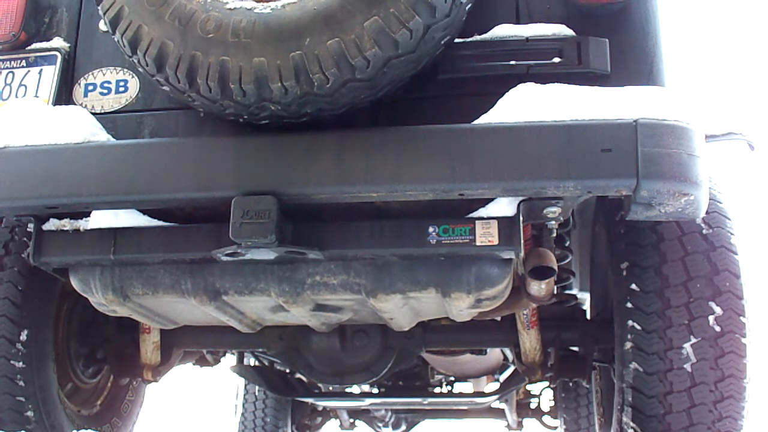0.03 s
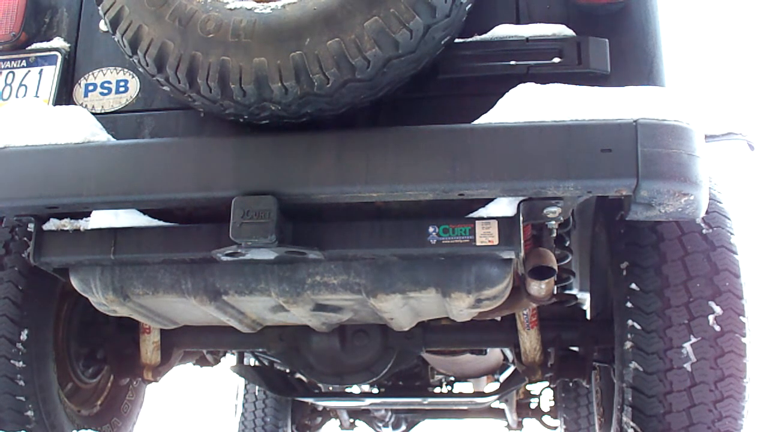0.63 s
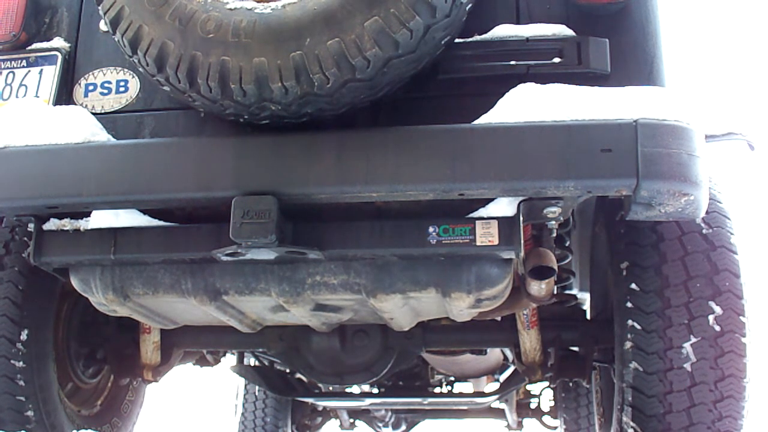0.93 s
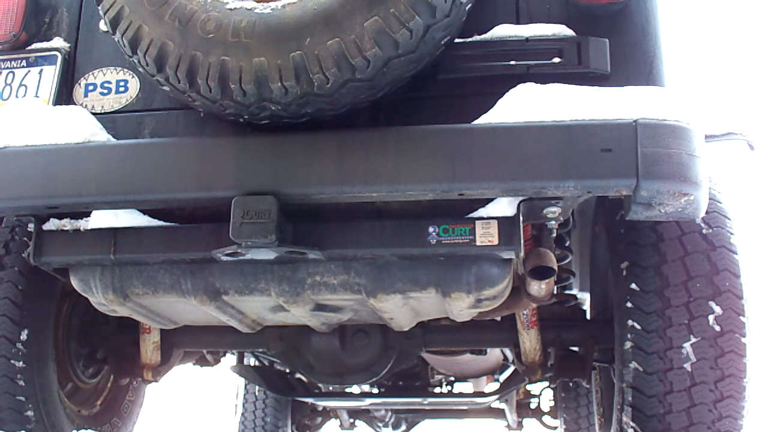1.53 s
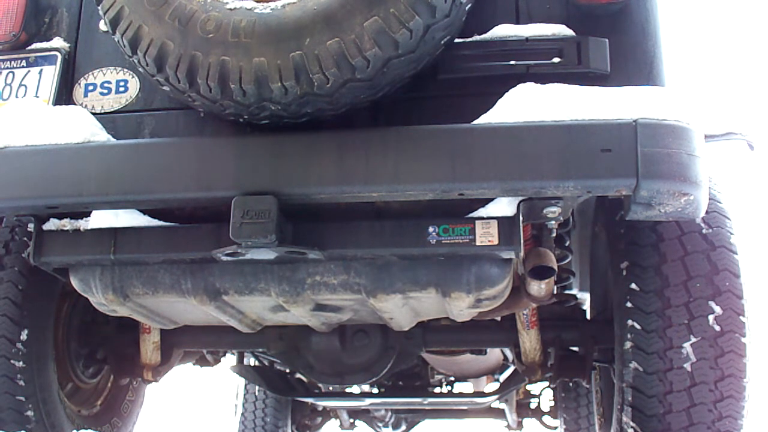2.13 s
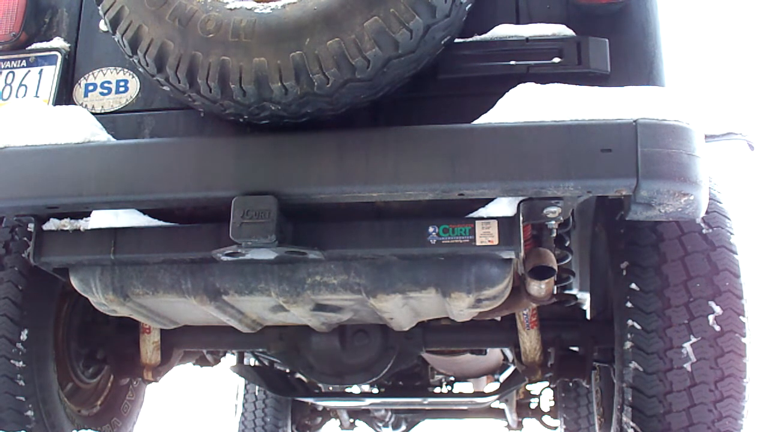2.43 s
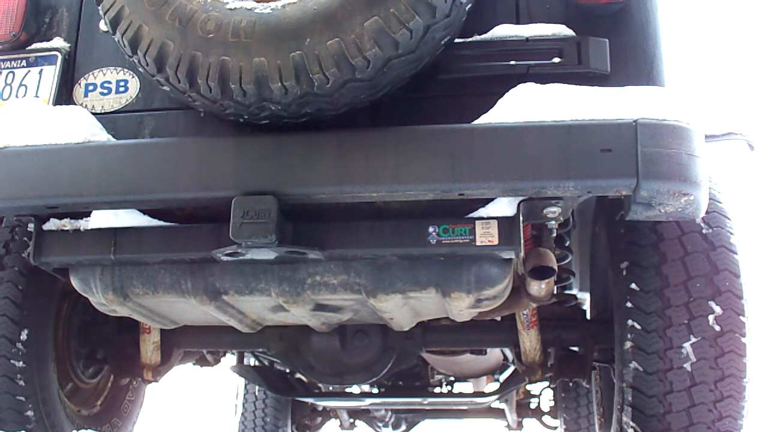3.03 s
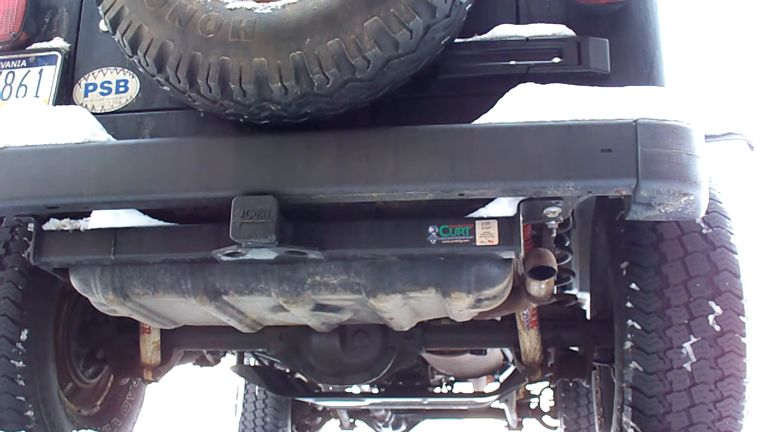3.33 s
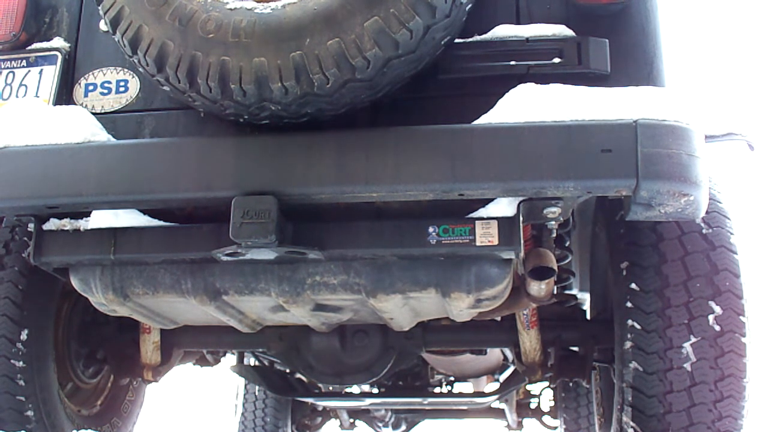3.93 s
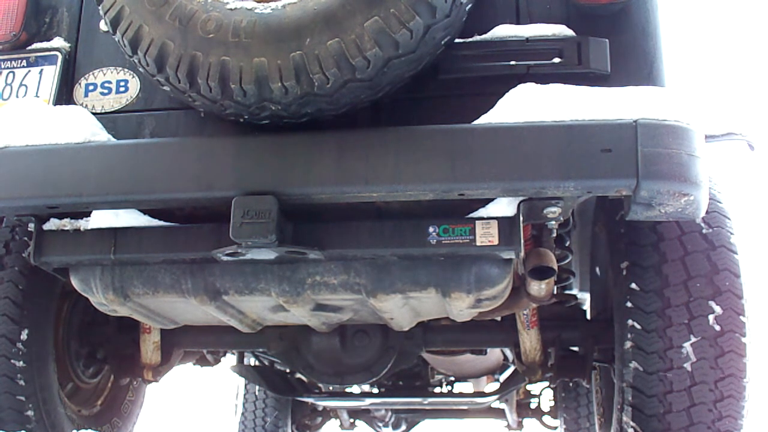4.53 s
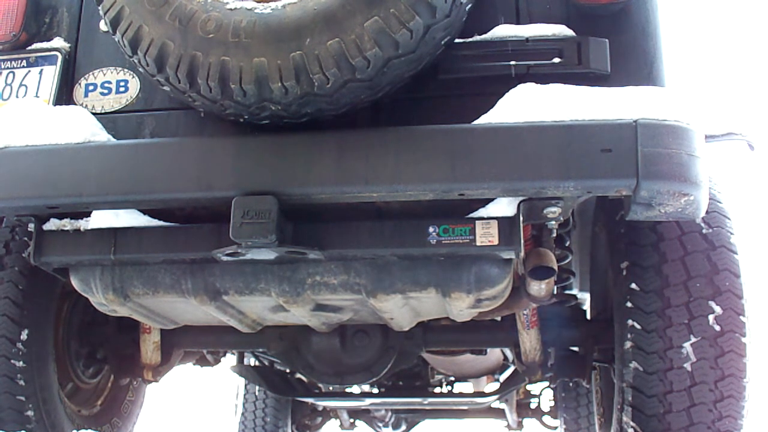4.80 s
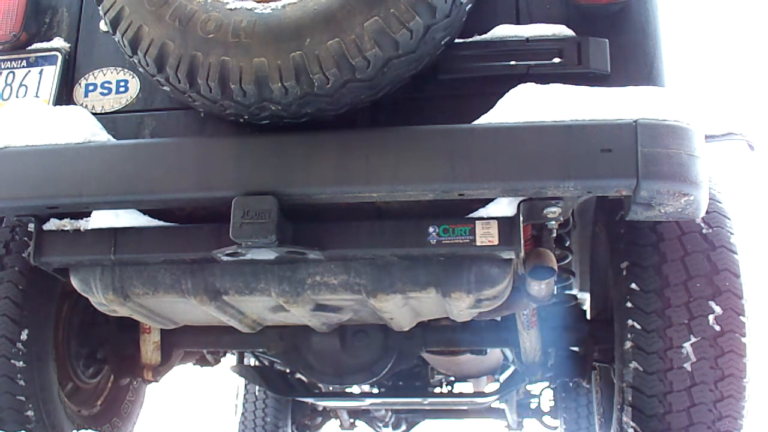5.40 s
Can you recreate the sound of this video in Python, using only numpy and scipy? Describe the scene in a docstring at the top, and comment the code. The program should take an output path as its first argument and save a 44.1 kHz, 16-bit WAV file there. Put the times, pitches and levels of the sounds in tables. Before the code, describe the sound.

Outdoors, close behind the tailpipe of an off-road vehicle, a few soft crunches sound over a faint distant rumble, followed by the very faint hum of a fuel pump. The starter engages with a metallic clash and cranks unevenly, whining and grinding. The engine coughs, then catches with a brief exhaust rattle, flares up loudly and sinks toward a fast idle.

```python
"""A four-cylinder engine is started on a cold day, heard outdoors from just behind the tailpipe.
Over a distant rumble come a few soft crunches, then the hum of the fuel pump. The starter engages;
its gear teeth whine and grind, sagging in pitch against each compression, and one cylinder coughs.
Then the engine catches and loose exhaust parts rattle. The train of firings drives the resonances
of the pipe as the speed flares up and sinks towards a fast idle."""
import sys
import numpy as np
from scipy import signal
from scipy.fft import rfft, irfft
from scipy.io import wavfile
from scipy.ndimage import uniform_filter1d

SR = 44100
rng = np.random.default_rng(int(sys.argv[2]) if len(sys.argv) > 2 else 0)


def wav_out(sig):
    """Save sig, one row per channel (or a flat mono array), as 16-bit PCM at SR to the path in sys.argv[1]."""
    wavfile.write(sys.argv[1], SR, np.round(np.clip(np.atleast_2d(sig).T, -1, 1) * 32767).astype(np.int16))


N = 245195
TIME = np.arange(N) / SR
BIN_HZ = np.arange(N // 2 + 1) * SR / N


def from_db(db):
    """Amplitude ratio of a level in decibels."""
    return 10 ** (np.asarray(db) / 20)

def rms_one(x):
    """Normalisation to unit power."""
    return x / np.sqrt(np.mean(x ** 2) + 1e-20)

def between(start, end, fade):
    """Trapezoidal gate that opens at start and is shut by end."""
    return np.clip((TIME - start) / fade, 0, 1) * np.clip((end - TIME) / fade, 0, 1)

def swell(centre, width):
    """Gaussian envelope of height 1."""
    return np.exp(-np.minimum(((TIME - centre) / width) ** 2, 50))

def cut(x, hz, kind, order=2):
    """Butterworth low- or high-pass filter."""
    return signal.sosfilt(signal.butter(order, hz, kind, fs=SR, output="sos"), x + 1e-18)

def drift(hz):
    """Random modulation: low-passed noise of unit power."""
    return rms_one(irfft(rfft(rng.standard_normal(N)) / (1 + (BIN_HZ / hz) ** 2), N))

def coloured(x, spectrum):
    """Spectral shaping by a smooth curve with steep skirts, at unit power."""
    hz = np.maximum(BIN_HZ, 1)
    points, db = np.transpose(spectrum)
    skirts = np.minimum(hz / points[0], 1) ** 4 * np.minimum(points[-1] / hz, 1) ** 8
    gain = from_db(np.interp(np.log(hz), np.log(points), db))
    return rms_one(irfft(rfft(x) * skirts * gain, N))

def resonate(x, modes):
    """Modal superposition: damped resonators in parallel, with alternating signs."""
    out = np.zeros(x.shape)
    for k, (hz, width, db) in enumerate(modes):
        r = np.exp(-np.pi * width / SR)
        poles = [1, -2 * r * np.cos(2 * np.pi * hz / SR), r * r]
        out += (-1) ** k * from_db(db) * (1 - r * r) / 2 * signal.lfilter([1, 0, -1], poles, x + 1e-18)
    return out

def evened(x):
    """Running normalisation: power stays near 1 over tenths of a second, and the pulses survive."""
    power = uniform_filter1d(uniform_filter1d(x * x, SR // 10), SR // 20)
    return x / np.sqrt(np.abs(power) + np.mean(x * x) / 1000)

def grains(per_s, spread_db):
    """Shot noise: dense random impulses of uneven size."""
    sizes = from_db(spread_db * np.minimum(rng.exponential(1, N), 4))
    return (rng.random(N) < per_s / SR) * sizes * rng.standard_normal(N)

def bursts(events, rise, hold, t60):
    """Mid and treble envelopes of short blows: linear attack, hold, exponential decay."""
    mids, treble = np.zeros(N), np.zeros(N)
    for s, db, treble_db in events:
        age = TIME - s
        shape = np.clip(age / rise, 0, 1) * from_db(-60 * np.clip(age - hold, 0, 2 * t60) / t60)
        mids += from_db(db) * shape
        treble += from_db(db + treble_db) * shape
    return mids, treble

def wavering_tone(hz, depth, drift_hz):
    """Random frequency modulation of a sinusoid of unit power."""
    phase = 2 * np.pi * np.cumsum(hz * (1 + depth * drift(drift_hz))) / SR
    return np.sqrt(2) * np.sin(phase)


# Course of the distant rumble. Each row: time in seconds, relative level in dB.
RUMBLE_LEVEL = [(0, -35.5), (0.3, -45), (1.0, -43), (1.6, -49.5), (2.7, -44.5)]
# Spectra of the rumble and of still air. Each row: frequency in Hz, relative density in dB.
RUMBLE_COLOUR = [(22, 3), (80, -4.5), (130, -16.5), (200, -21.5)]
AIR_COLOUR = [(160, 1.5), (270, 2), (480, -3), (1100, -6.5), (1900, -11), (2900, -23), (4000, -27.5),
              (7000, -23), (9500, -40.5)]

def outdoor_air():
    """Ambient noise: distant rumble and still air are two slowly modulated random spectra."""
    rumble_db = np.interp(TIME, *np.transpose(RUMBLE_LEVEL)) - 1.5
    rumble = from_db(rumble_db) * coloured(rng.standard_normal(N), RUMBLE_COLOUR)
    return rumble + from_db(-56.5 + drift(6.9)) * coloured(rng.standard_normal(N), AIR_COLOUR)

# Faint tones. Each row: start and end in seconds, frequency in Hz, rms level in dB.
HUMS = [(-0.014, 0.128, 333, -53), (0.318, 0.388, 409, -53), (1.515, 2.148, 998, -66.5),
        (2.438, 2.537, 422, -60.5), (2.742, 2.836, 412, -48.5)]

def hums():
    """Gated tones waver by frequency modulation; the longest is the fuel pump."""
    return sum(from_db(db) * between(start, end, fade=0.02) * wavering_tone(hz, 0.0093, drift_hz=41)
               for start, end, hz, db in HUMS)

# Tiny high ticks. Each row: start in seconds, level in dB.
TICKS = [(2.141, -64), (2.728, -61)]

def ticks():
    """Exponential decay of a high band of noise is heard as a tick."""
    sizzle = coloured(rng.standard_normal(N), [(6600, 0), (8400, -7)])
    return sizzle * sum(from_db(db) * (TIME > s) * np.exp(-np.abs(TIME - s) / 0.045) for s, db in TICKS)

# A thin whine in the background. Each row: frequency in Hz, rms level in dB.
THIN_WHINE = [(7714, -79.5), (8285, -84)]

def thin_whine():
    """Superposition of two steady pure tones."""
    return sum(from_db(db) * np.sqrt(2) * np.sin(2 * np.pi * hz * TIME) for hz, db in THIN_WHINE)

# Soft crunches. Each row: start in seconds, relative level in dB, treble offset in dB.
CRUNCHES = [(0.049, -33, -25.5), (0.118, -35.5, -22), (0.222, -42, -21), (0.557, -33.5, -33),
            (0.61, -40.5, -21), (0.672, -31, -20), (0.796, -32, -24.5), (0.84, -40, -37), (0.883, -42, -19),
            (0.951, -28, -22.5), (1.057, -33.5, -22), (1.205, -32, -20)]
# Spectra of a crunch and of every source's hiss. Each row: frequency in Hz, relative density in dB.
CRUNCH_COLOUR = [(220, -0.5), (450, 5.5), (700, 4), (950, -1.5), (1250, -3), (2100, -10), (2800, -11.5),
                 (3600, -20.5)]
HISS_COLOUR = [(4300, -11.5), (5200, -2.5), (6600, 3), (7700, -0.5), (8700, -8), (9600, -29.5)]

def crunches():
    """Granular noise: each crunch is a short swarm of contacts with a faint tail."""
    mids, treble = bursts(CRUNCHES, rise=0.004, hold=0.018, t60=0.11)
    tail, _ = bursts(CRUNCHES, rise=0.0041, hold=0.038, t60=0.88)
    envelope = from_db(-14) * mids + from_db(-28) * tail
    body = envelope * coloured(grains(5000, spread_db=2), CRUNCH_COLOUR)
    return body + from_db(-6) * treble * coloured(grains(4300, spread_db=0), HISS_COLOUR)

# Blows of loose exhaust parts. Each row: start in seconds, relative level in dB, treble offset in dB.
RATTLES = [(3.979, -27.5, -7), (4.037, -29, -6), (4.065, -32, -16), (4.118, -28.5, -10)]
# Modes of their sheet metal. Each row: frequency in Hz, bandwidth in Hz, relative gain in dB.
SHEET_MODES = [(480, 44, 8), (1724, 134, -0.5), (2340, 71, -1.5), (2616, 81, -7), (3180, 28, -3)]

def rattles():
    """Impact excitation of plate modes: the first hard firings shake thin metal against its mounts."""
    mids, treble = bursts(RATTLES, rise=0.0019, hold=0.0068, t60=0.21)
    contacts = rms_one(grains(2500, spread_db=-1.5))
    return from_db(16) * resonate(mids * contacts, SHEET_MODES) + treble * coloured(contacts, HISS_COLOUR)

# Pinion striking flywheel. Each row: start in seconds, relative level in dB, treble offset in dB.
CLASHES = [(2.812, -21, -7), (2.835, -27, -9.5), (3.306, -22.5, -7), (3.596, -18.5, -10), (3.719, -22, -16),
           (3.84, -33, -6)]
# Spectrum of grinding teeth. Each row: frequency in Hz, relative density in dB.
GRIND_COLOUR = [(200, -5), (700, -5), (1350, 0), (2200, -4.5), (3400, -19), (4300, -38.5)]
# Modes of the flywheel housing. Each row: frequency in Hz, bandwidth in Hz, relative gain in dB.
HOUSING_MODES = [(254, 6.2, 1), (694, 9.8, 3), (960, 9.3, -0.5), (1268, 70, 3), (1874, 9, -4.5),
                 (2340, 27, -12.5), (3150, 6.5, -9)]

def clashes():
    """Impulse response: clusters of hard metal contacts leave the housing ringing."""
    mids, treble = bursts(CLASHES, rise=0.00084, hold=0.0038, t60=0.24)
    contacts = rms_one(grains(2500, spread_db=-4.5))
    crash = from_db(-5) * mids * coloured(contacts, GRIND_COLOUR)
    ring = from_db(15) * resonate(mids * contacts, HOUSING_MODES)
    return crash + ring + treble * coloured(contacts, HISS_COLOUR)

def housing_howl(hz=700, db=-37.5):
    """Sustained resonance: in the last strokes the grinding keeps one housing mode singing unsteadily."""
    return from_db(db) * between(3.595, 3.865, fade=0.029) * wavering_tone(hz, 0.01, drift_hz=40)

# Lone firings before the engine runs. Each row: start in seconds, relative level in dB.
COUGHS = [(3.493, -2.5), (3.904, -5.5), (3.966, -2), (4.014, -4.5)]
# Low modes of the exhaust pipe. Each row: frequency in Hz, bandwidth in Hz, relative gain in dB.
LOW_PIPE_MODES = [(36.2, 9.1, -9), (106.4, 24.5, -3), (209.5, 23.3, -3)]

def coughs(length_s=0.0294):
    """Transient excitation of an air column: a lone firing sends one push and pull down the pipe."""
    puffs = np.zeros(N)
    for s, db in COUGHS:
        age = np.clip((TIME - s) / length_s, 0, 1)
        puffs += from_db(db) * np.sin(2 * np.pi * age) * np.sqrt(age)
    return from_db(-12.5) * puffs + from_db(7.5) * resonate(puffs, LOW_PIPE_MODES)

ENGAGE_S, RELEASE_S = 2.8, 3.985
# Strokes of the crank. Each row: fastest moment, time speeding up and time slowing down in seconds,
# top tooth rate in Hz, then relative levels of whine, groan, grind and hiss in dB.
STROKES = [(3.05, 0.21, 0.18, 1173, -29, -19.5, -29.5, -32.5),
           (3.328, .03, .15, 1297, -29, -50, -32.5, -34.5), (3.5, .05, .06, 897, -54, -50, -32.5, -31.5),
           (3.605, .025, .042, 996, -42, -22, -30.5, -25.5),
           (3.737, .085, 0.066, 1105, -35, -27.5, -30.5, -28),
           (3.869, .04, 0.03, 1108, -42.5, -45, -27.5, -27), (3.945, 0.019, 0.021, 815, -38, -25, -35, -55)]

def cranking(labouring_hz=658, spin_up_s=0.04, breakaway_s=0.17):
    """Load modulation: whine and hiss follow crank speed, grind and groan follow the compression."""
    from_engage = np.abs(TIME - ENGAGE_S)
    tooth_hz = labouring_hz * (1 - 0.5 * np.exp(-from_engage / spin_up_s))
    # powers add: a steady floor plus the effort of breaking the cold engine loose
    breakaway = np.exp(-np.minimum(from_engage / breakaway_s, 2) ** 4)
    whine = from_db(-49) ** 2 + (from_db(-28.5) * breakaway) ** 2
    grind = from_db(-34.5) ** 2 + (from_db(-29) * breakaway) ** 2
    hiss = from_db(-38.5) ** 2 + (from_db(-41) * breakaway) ** 2
    for s, rise, fall, top_hz, whine_db, groan_db, grind_db, hiss_db in STROKES:
        arch = np.cos(np.pi / 2 * np.interp(TIME, [s - rise, s, s + fall], [-1, 0, 1])) ** 2
        tooth_hz += (top_hz - labouring_hz) * arch
        groan = from_db(groan_db) * swell(s + 0.82 * fall, width=0.21 * fall)
        whine += from_db(whine_db) ** 2 * np.sqrt(arch) + groan ** 2
        grind += (from_db(grind_db) * swell(s + 0.46 * fall, width=0.57 * fall)) ** 2
        hiss += (from_db(hiss_db) * arch) ** 2
    return tooth_hz, np.sqrt(whine), np.sqrt(grind), np.sqrt(hiss)

# Harmonics of the gear mesh. Each row: multiple of the tooth rate, relative level in dB.
GEAR_PARTIALS = [(1, 3), (2, -1.5), (3, -8), (5, -8), (6, -13)]
# Modes of gear case and pinion. Each row: frequency in Hz, bandwidth in Hz, relative gain in dB.
GEAR_CASE_MODES = [(1460, 420, -1.5), (6440, 1140, 2)]
PINION_MODES = [(7708, 22, 0.5), (8290, 17, -3)]

def starter(brighten_db=4.5, pinion_teeth=9):
    """Gear meshing: periodic tooth contact whines at harmonics of the tooth rate, and friction grinds."""
    tooth_hz, whine_gain, grind_gain, hiss_gain = cranking()
    # backlash makes the mesh shiver in pitch and strength
    phase = 2 * np.pi * np.cumsum(tooth_hz * (1 + 0.03 * drift(250))) / SR
    # fast teeth meet harder, so the upper partials grow with speed
    tilt_db = brighten_db * np.log2(tooth_hz / 1150)
    mesh = sum(from_db(db + max(k - 2, 0) * tilt_db + 3.8 * drift(90)) * np.sin(k * phase)
               for k, db in GEAR_PARTIALS)
    whine = whine_gain * resonate(mesh, GEAR_CASE_MODES)
    # the pinion rubs harder once a turn
    rub = from_db(2 * np.sin(phase / pinion_teeth) + 1.2 * drift(80))
    contacts = grains(9000, spread_db=0) * rub
    grind = from_db(-3) * coloured(contacts, GRIND_COLOUR)
    grind += from_db(-4.5) * rms_one(resonate(contacts, HOUSING_MODES))
    hiss = from_db(-4) * coloured(contacts, HISS_COLOUR)
    pinion_ring = from_db(-46.5) * rms_one(resonate(contacts, PINION_MODES))
    # the labouring engine rocks the body and pumps air through the pipe
    shake = from_db(-8.5) * rms_one(resonate(cut(rng.standard_normal(N), 52, "low"), LOW_PIPE_MODES))
    engaged = between(ENGAGE_S, RELEASE_S, fade=0.012)
    return engaged * (whine + pinion_ring + grind_gain * (grind + shake) + hiss_gain * hiss)

def pipe_echo(x, reflection=0.27, spacing_hz=104):
    """Standing waves: sound runs up and down the tailpipe, losing strength on every trip."""
    round_trip = reflection * np.exp(-2j * np.pi * BIN_HZ / spacing_hz)
    return rms_one(irfft(rfft(x) / (1 - round_trip), N))

# What the silencer lets through. Each row: frequency in Hz, relative level in dB.
SILENCER = [(30, -22.5), (41, -16), (49, -18), (62, -34.5), (74, -29), (90, -30.5), (104, -18.5),
            (135, -19), (170, -23.5), (203, -15.5), (240, -39), (320, -32.5), (355, -47.5), (402, -27.5),
            (440, -41)]
# Pulse harmonics. Each row: multiple of the firing rate, gain in dB when round, gain in dB when sharp.
PULSE_SHAPE = [(1, 0.5, -1.5), (2, 2.5, -1.5), (3, -11, -3), (4, -13, -3.5), (6, -9.5, -1), (7, -13, -5)]

def boom(firing_hz, firings, sharpen_s=(4.55, 4.67)):
    """Fourier series of the pulses behind the silencer; they sharpen as the speed tops out."""
    silencer_hz, silencer_db = np.transpose(SILENCER)
    pulses = np.zeros(N)
    for k, round_db, sharp_db in PULSE_SHAPE:
        db = np.interp(np.log(k * firing_hz), np.log(silencer_hz), silencer_db)
        db += np.interp(TIME, sharpen_s, [round_db, sharp_db])
        phase = 2 * np.pi * k * firings + (k - 1) * np.pi / 2
        pulses -= from_db(db + 1.2 * drift(25)) * np.sqrt(2) * np.cos(phase)
    return pulses

# Engine speed. Each row: time in seconds, firings per second.
FIRING_RATE = [(4.04, 26.6), (4.094, 31.5), (4.144, 35.9), (4.23, 43.2), (4.296, 49.6), (4.364, 56.6),
               (4.454, 63.8), (4.598, 71.2), (4.69, 68.4), (5.168, 50.7), (5.388, 43.5), (5.56, 42.8)]
# Swells of the gas flow. Each row: centre in seconds, half width in seconds, relative rise in dB.
SURGES = [(4.09, 0.045, 2.5), (4.635, 0.092, 4), (5.038, .11, 5.5)]
# Cylinders in firing order. Each entry: relative strength in dB.
CYLINDERS_DB = [0.36, -0.44, -1.5, -1.8]
# Upper modes of the exhaust pipe. Each row: frequency in Hz, bandwidth in Hz, relative gain in dB.
HIGH_PIPE_MODES = [(311.4, 30, 5), (401.3, 9.4, 10.5), (498.6, 14, -0.5), (619.3, 13.5, 3.5),
                   (700, 39, -10), (934, 6.8, -3.5), (1041, 19, -1.5)]
# Spectrum of the turbulent gas. Each row: frequency in Hz, relative density in dB.
RASP_COLOUR = [(430, -4.5), (850, -13.5), (1200, -11.5), (2000, -18.5), (3200, -31), (4300, -29)]

def exhaust(uneven_db=1.0, puff_depth=0.14):
    """Forced vibration of an air column: each firing booms, rings the pipe and expels turbulent gas."""
    firing_hz = np.interp(TIME, *np.transpose(FIRING_RATE))
    firings = np.cumsum(firing_hz * (TIME > 3.92)) / SR
    count, cycle = firings.astype(int), firings % 1
    surge_db = sum(db * swell(s, width) for s, width, db in SURGES)
    flowing = np.clip((TIME - 3.925) / 0.03, 0, 1)
    running = np.clip((TIME - 4.03) / 0.015, 0, 1)
    pulses = running * boom(firing_hz, firings)
    # cold cylinders burn unevenly: a repeating pattern plus chance
    chance = rng.standard_normal(count[-1] + 1)
    strength = from_db(np.array(CYLINDERS_DB)[count % 4] + uneven_db * chance[count])
    beats = cut(np.diff(count, prepend=0), 1500, "low")  # the silencer rounds off each pulse
    # the contrast of strong and weak firings lopes in the low modes
    lope = from_db(-30 + 0.98 * surge_db) * evened(resonate(beats * (strength - 1), LOW_PIPE_MODES))
    puff = strength * np.exp(-cycle / 0.64)
    # slow firings burn raggedly, fast ones give clean pulses
    drive = beats * strength + 0.052 * (55 / firing_hz) ** 2 * puff * rng.standard_normal(N)
    upper_modes = cut(resonate(drive, HIGH_PIPE_MODES), 240, "high", order=4)
    ring = from_db(-32 + 0.98 * surge_db) * evened(upper_modes)
    flow = 1 - puff_depth + 3 * puff_depth * puff
    turbulence = pipe_echo(coloured(grains(14000, spread_db=-3.5), RASP_COLOUR))
    rasp = from_db(-34 + 0.58 * surge_db) * flow * turbulence
    # each exhaust valve opens with a brief spit of hiss
    spit = 0.8 + 1.1 * strength * np.exp(-cycle / 0.12)
    hiss = from_db(-45.5 + 0.54 * surge_db) * spit * coloured(grains(14000, spread_db=-0.8), HISS_COLOUR)
    return pulses + flowing * (lope + ring + rasp + hiss)

def scene():
    """Linear superposition of all sources, close and in the open air."""
    background = outdoor_air() + hums() + ticks() + thin_whine() + crunches()
    engine = starter() + clashes() + coughs() + rattles() + exhaust() + housing_howl()
    return (background + engine)[None, :]

def record(dry, cutoff_hz=9900):
    """Frequency response of a small microphone: a dip in the upper mids and a steep top cut."""
    dipped = dry - resonate(dry, [(4080, 1490, -3.0)])
    return signal.sosfilt(signal.ellip(10, 0.2, 80, cutoff_hz, fs=SR, output="sos"), dipped)


dry = scene()
out = record(dry)
wav_out(out)
```